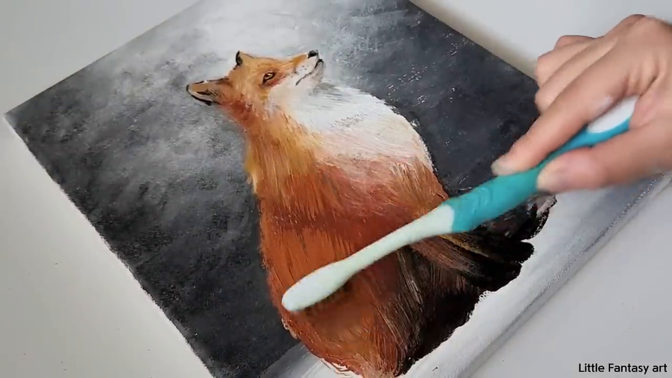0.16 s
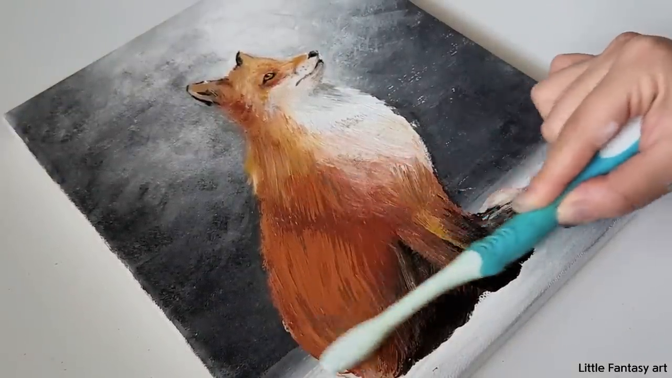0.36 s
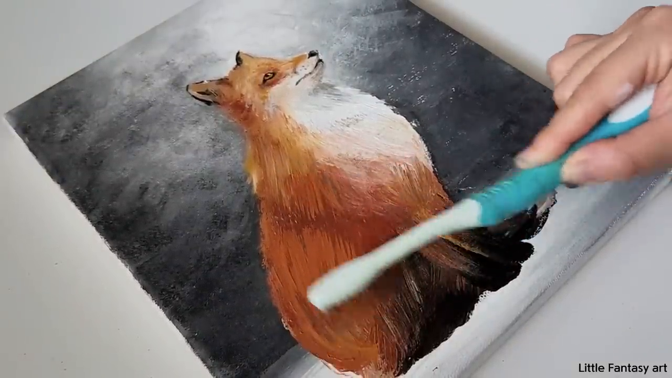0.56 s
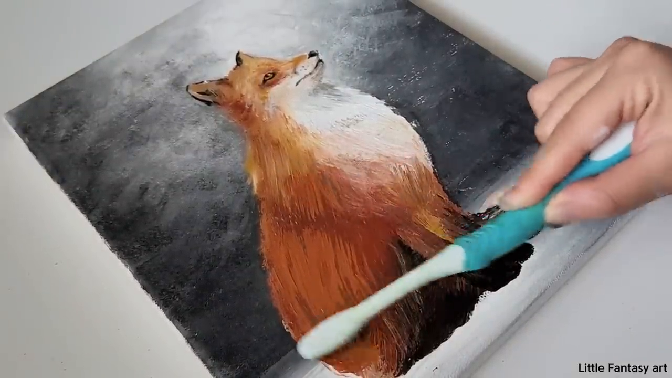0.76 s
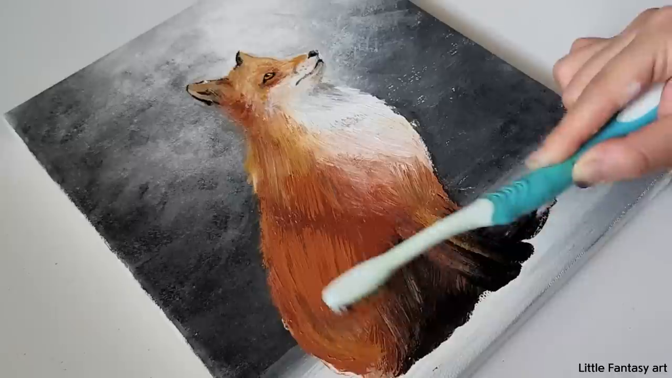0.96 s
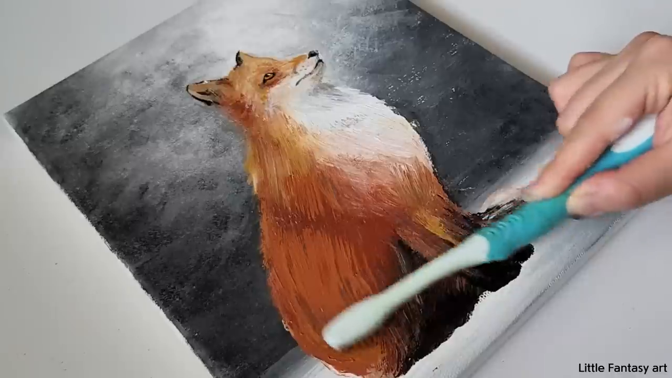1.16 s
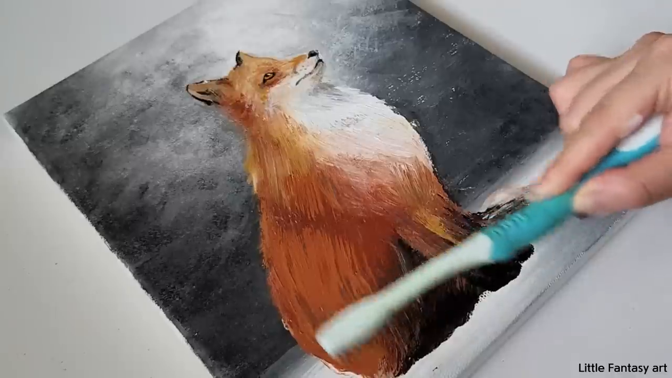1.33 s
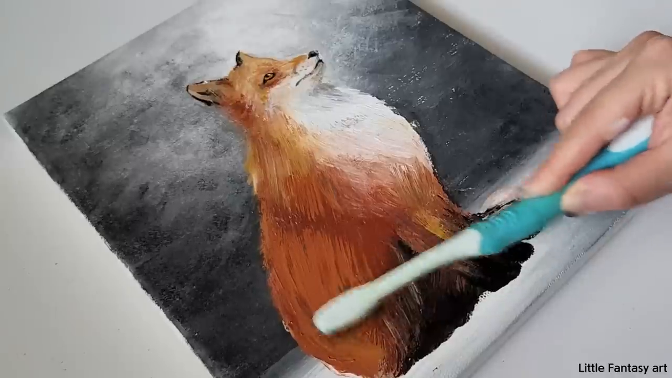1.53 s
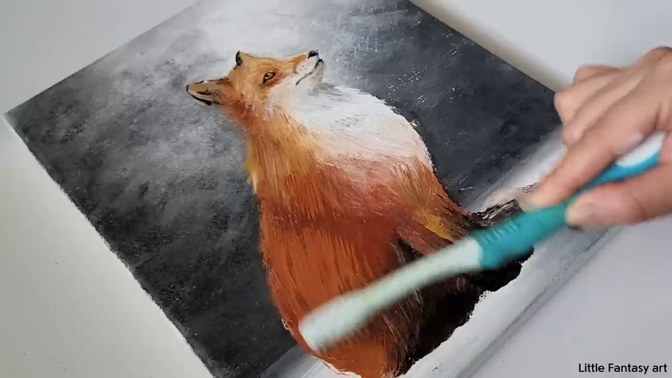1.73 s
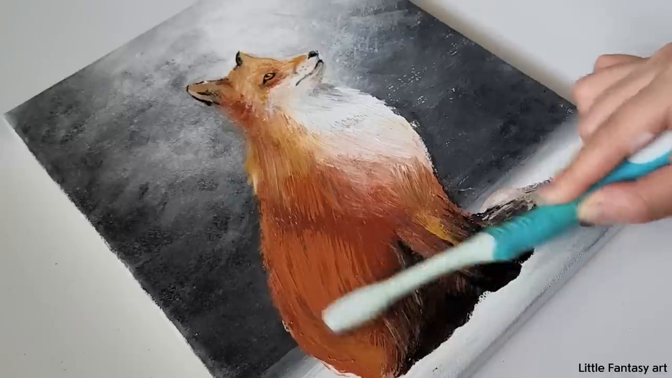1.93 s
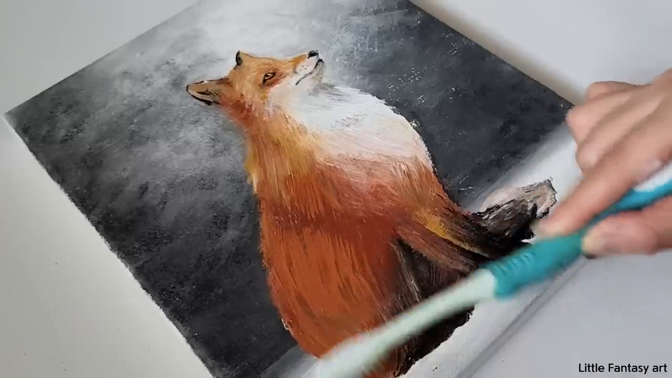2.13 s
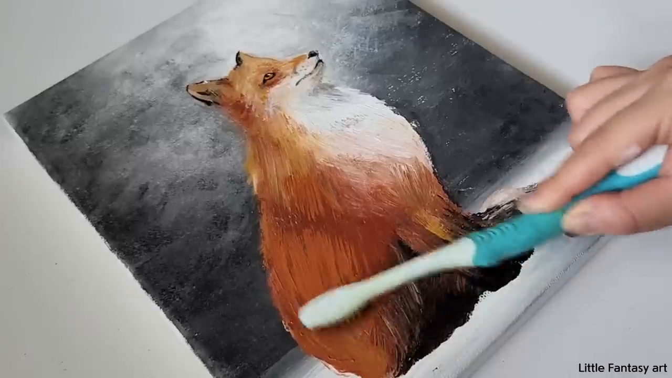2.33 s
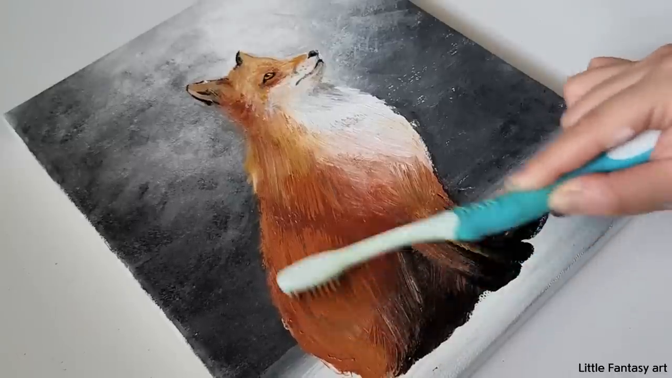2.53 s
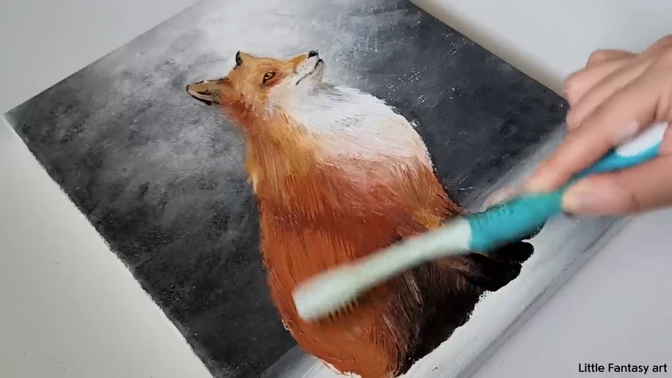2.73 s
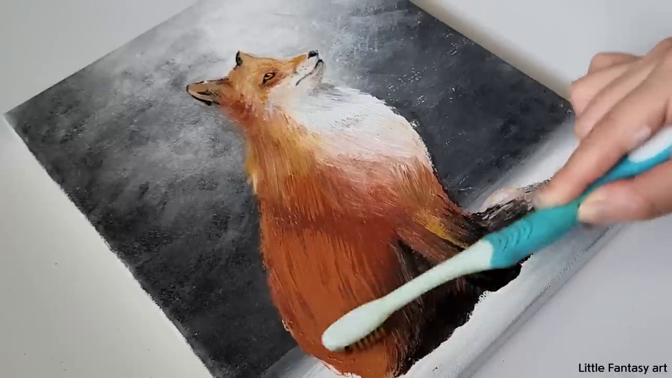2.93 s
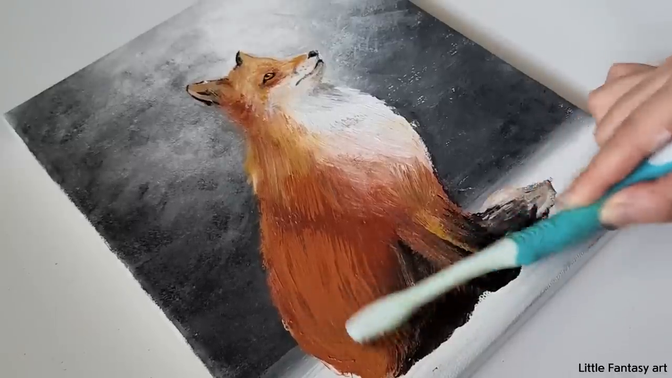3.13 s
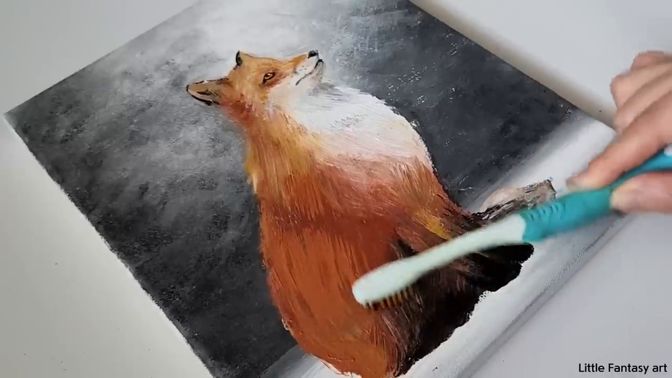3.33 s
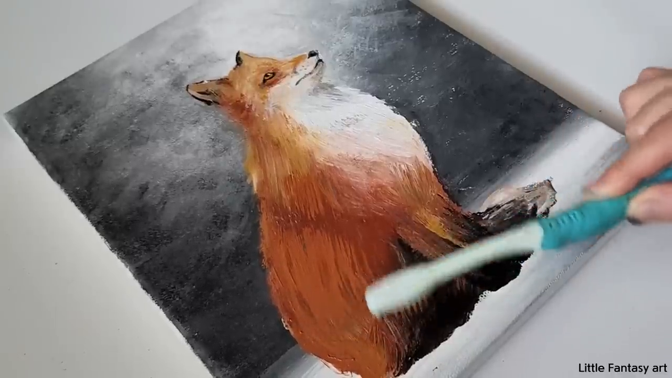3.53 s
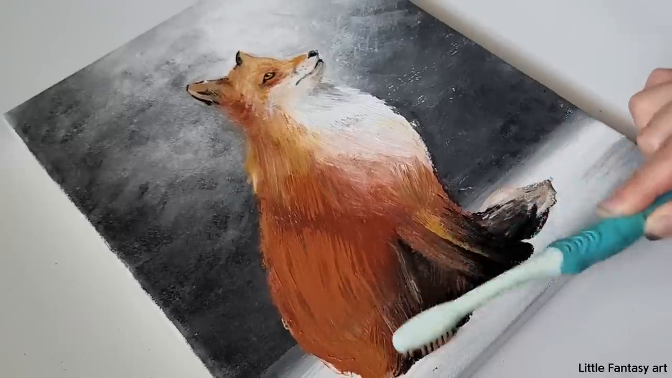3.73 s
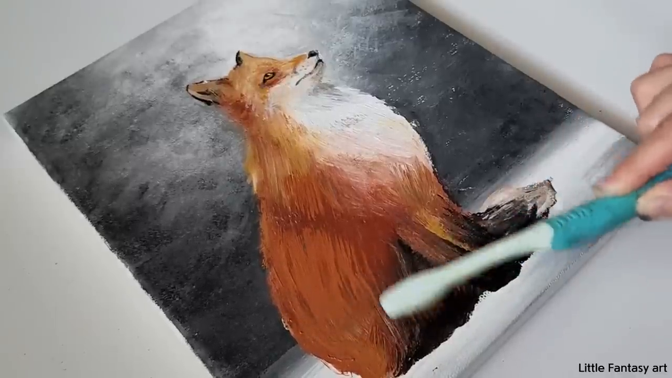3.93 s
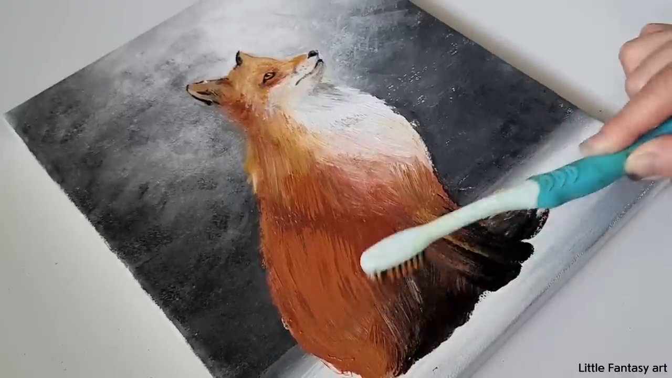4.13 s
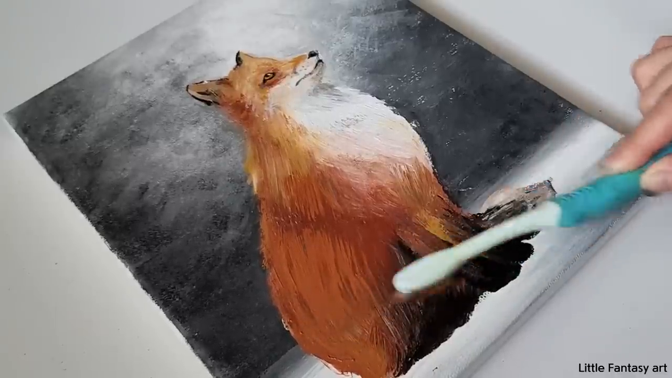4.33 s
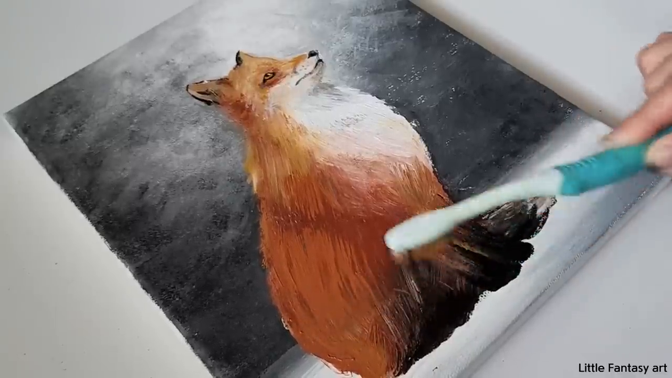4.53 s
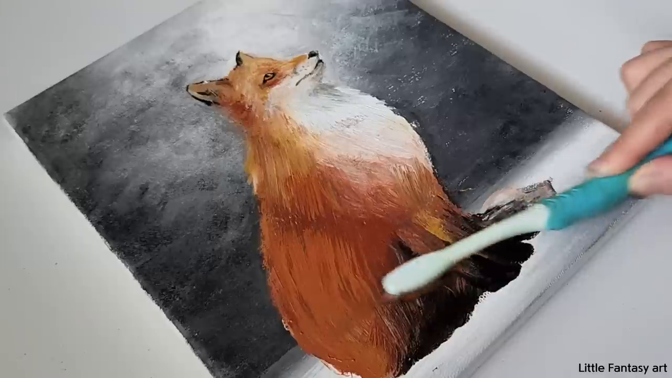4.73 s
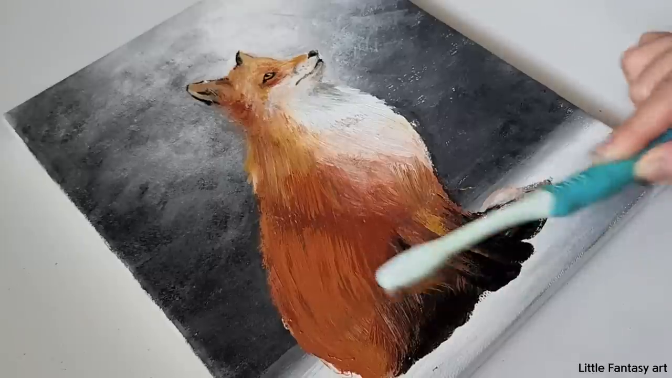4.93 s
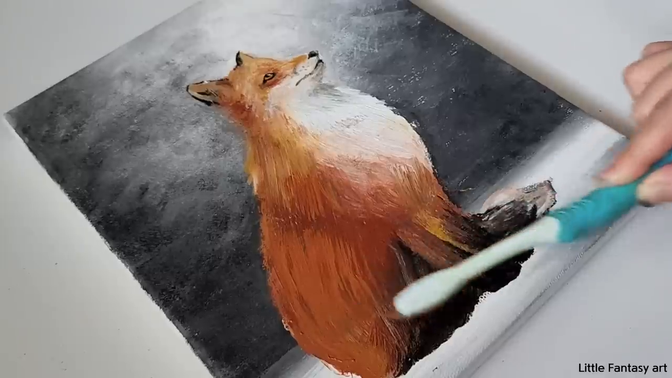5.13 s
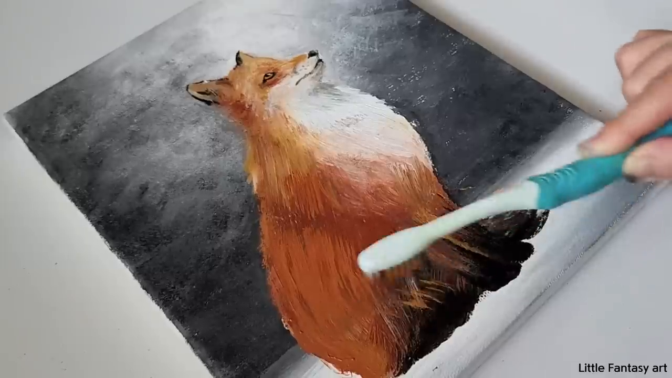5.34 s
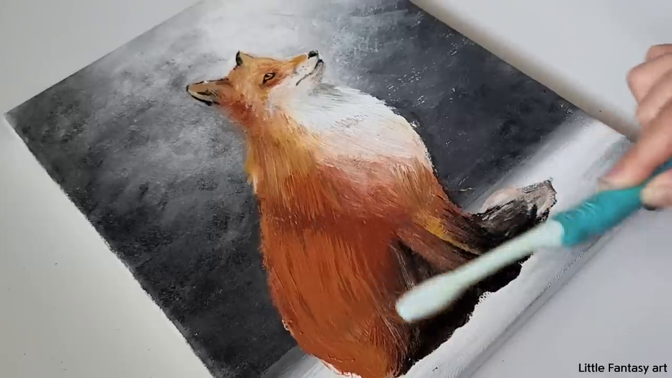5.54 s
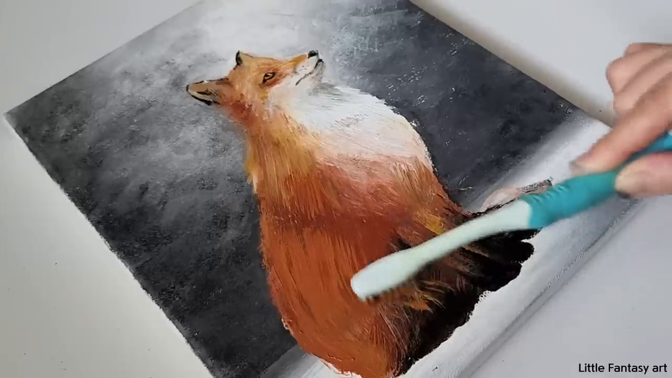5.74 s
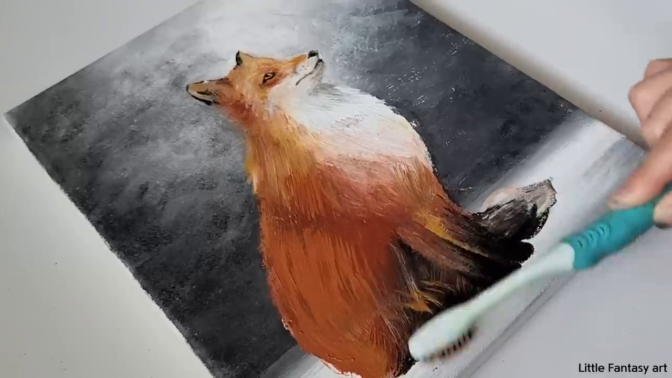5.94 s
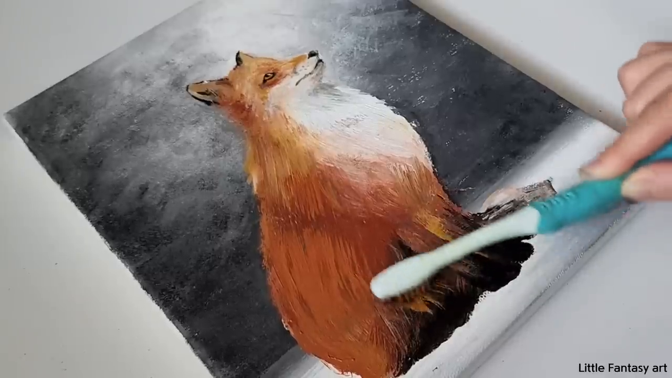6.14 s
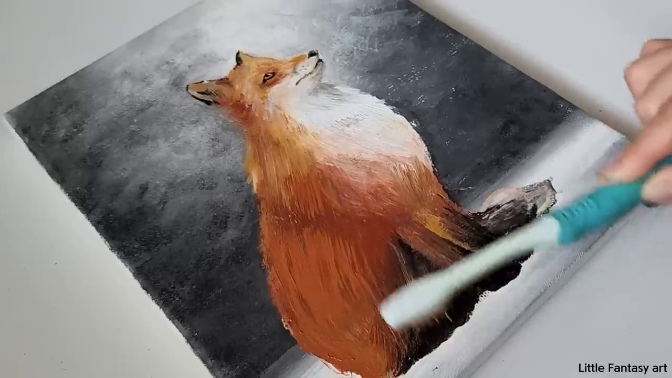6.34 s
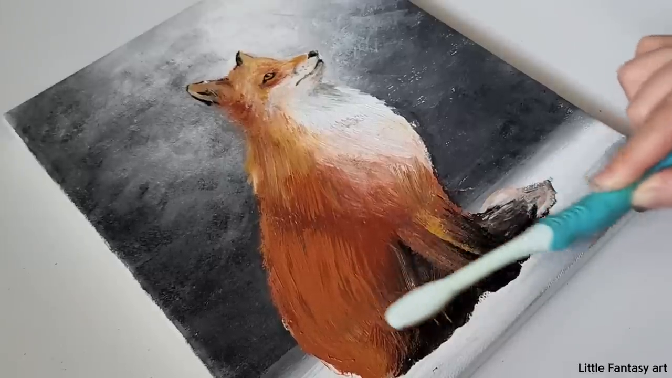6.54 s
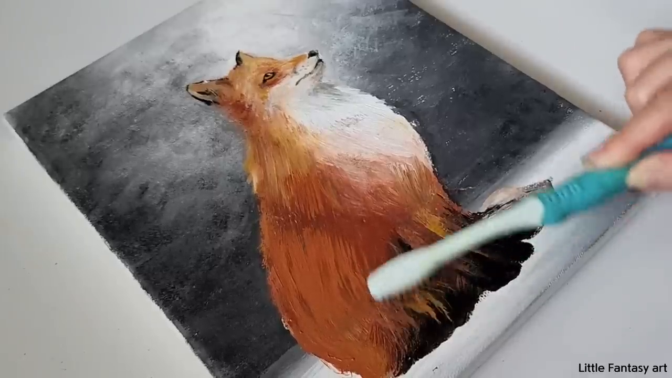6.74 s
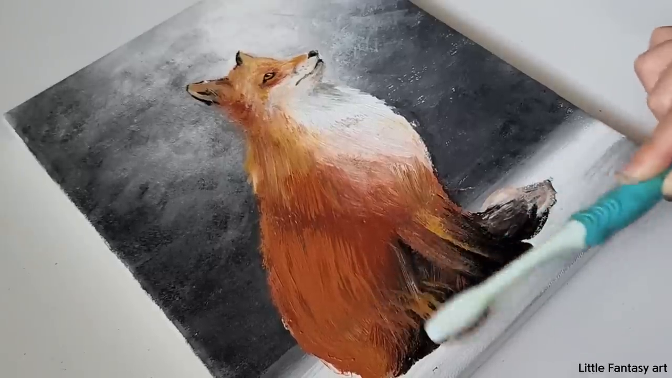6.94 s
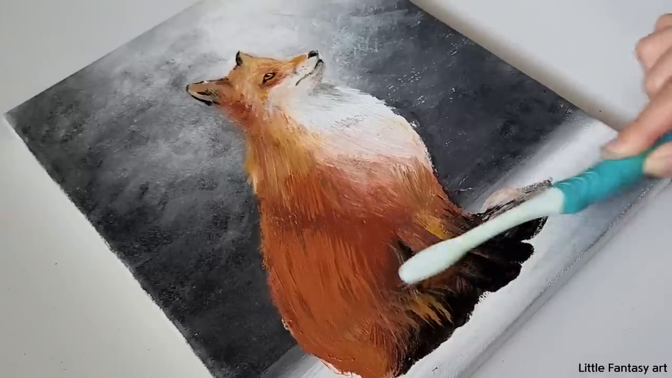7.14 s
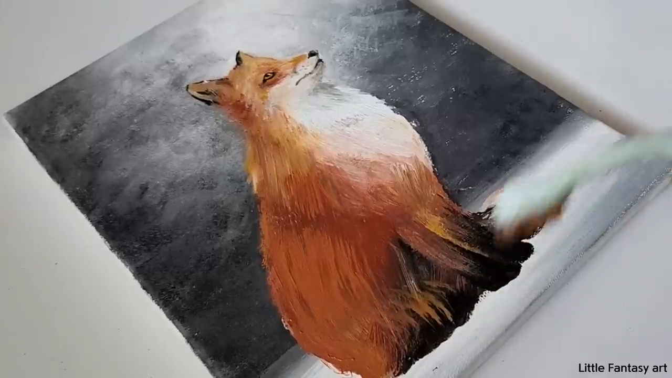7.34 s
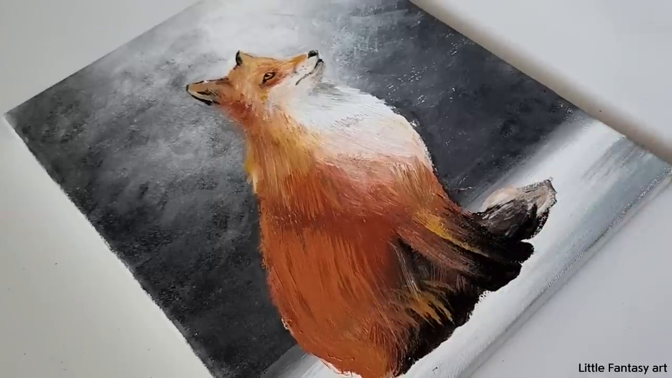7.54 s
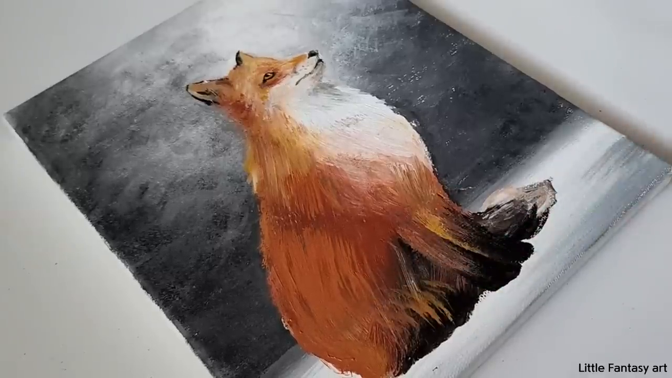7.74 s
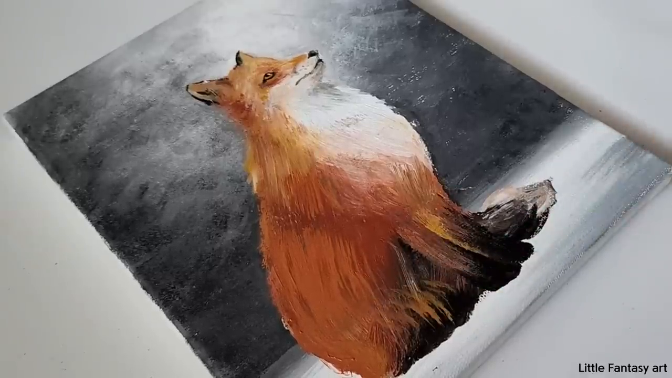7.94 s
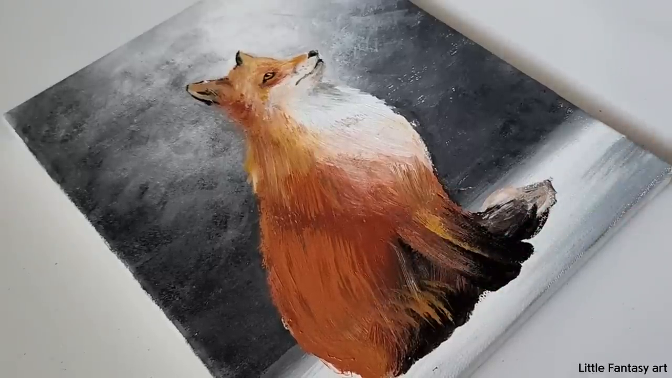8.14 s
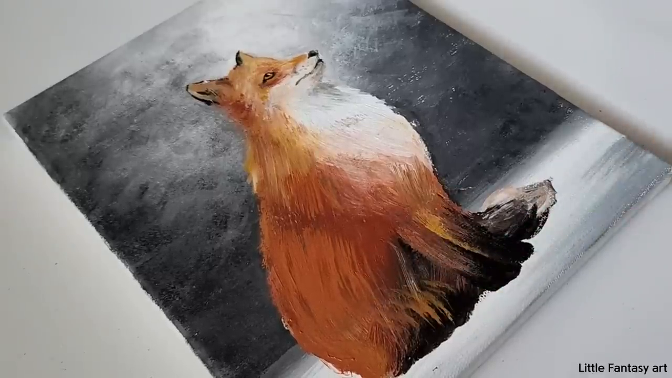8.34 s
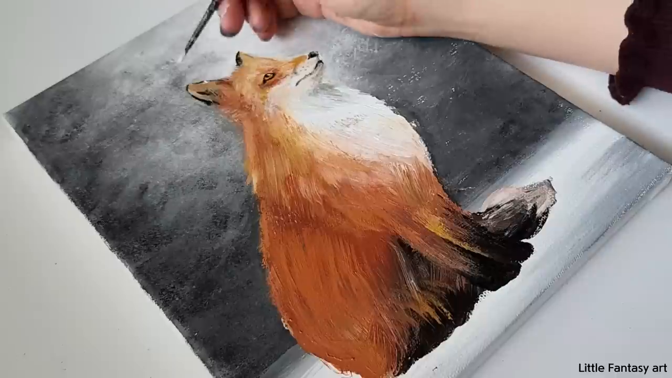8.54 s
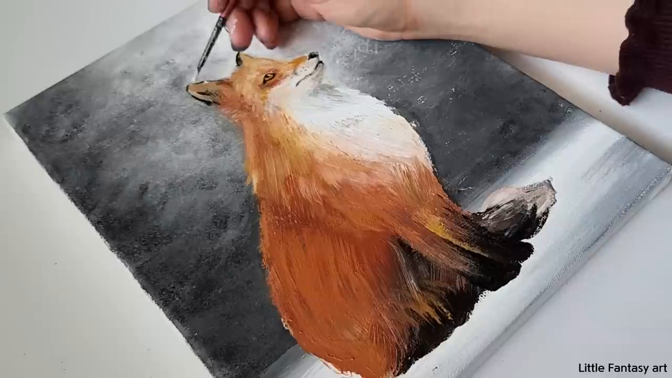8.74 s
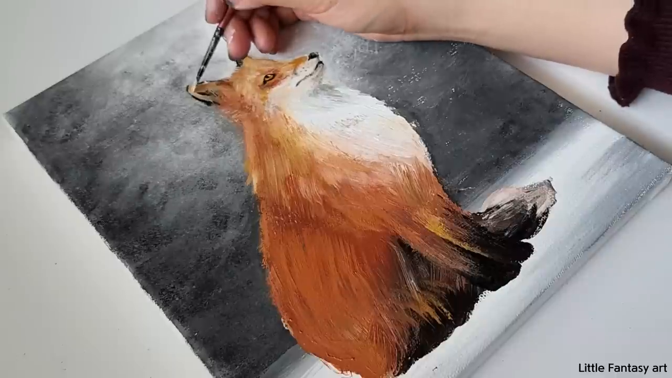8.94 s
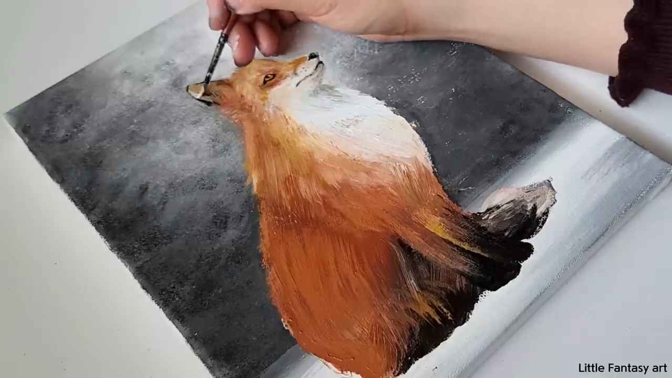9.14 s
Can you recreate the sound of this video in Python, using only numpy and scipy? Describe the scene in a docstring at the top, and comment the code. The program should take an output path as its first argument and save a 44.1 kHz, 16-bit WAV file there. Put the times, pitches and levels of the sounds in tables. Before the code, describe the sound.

A toothbrush strokes paint on a stretched canvas, very close to a stereo microphone in a small, dry room. Each stroke lands with a small plastic click and hollow knock, then a brief crisp rasp of bristles with the cloth drumming faintly beneath. Strokes start somewhat longer and slower, then become short and brisk. After about seven seconds they stop, leaving faint hiss, low rumble, tiny rustles and one soft bump.

```python
"""Brush strokes on canvas

A toothbrush strokes paint on a stretched canvas close to a two-port microphone. Each landing taps: filtered noise
makes the click, struck resonances the knock and thud. Then the bristles rasp over the weave: random impulses
make the hiss and set the canvas modes drumming. A small room answers. After the last stroke only the quiet
room is left: shaped noise for low rumble, hiss and a few faint rustles, and one soft low bump.
"""
import sys
import numpy as np
from scipy import signal
from scipy.fft import rfft, irfft, next_fast_len
from scipy.io import wavfile
from scipy.ndimage import uniform_filter1d, map_coordinates

SR = 44100
rng = np.random.default_rng(int(sys.argv[2]) if len(sys.argv) > 2 else 0)


def to_wav(s):
    """Save 16-bit WAV."""
    ch = np.atleast_2d(s).T  # columns
    pcm = np.round(np.clip(ch, -1, 1) * 32767)  # PCM
    wavfile.write(sys.argv[1], SR, pcm.astype(np.int16))


N = 409239
TIME = np.arange(N) / SR

# Brush strokes, one a row: start_s, click_level_db, knock_over_click_db, thud_over_click_db,
# knock_upper_modes_db, wait_before_sweep_s, sweep_length_s, rasp_level_db, swell_along_sweep_db, landing_scuff_db
STROKES = [(-0.2, -40.5, -8.5, -8, 0, 0.054, 0.15, -40.5, -6, -61),
           (0.1835, -28, -4, -13.5, -27, 0.057, 0.23, -47.5, 8, -62.5),
           (0.643, -29.5, -13.5, -18, -9, 0.034, 0.2, -46, 10.5, -82),
           (1.061, -39, 10.5, -4.5, 4, 0.092, 0.12, -43.5, -7.5, -66.5),
           (1.4129, -26, -0.5, -12, 5, 0.099, 0.15, -42.5, -6, -60.5),
           (1.816, -30.5, 1.5, -9.5, -27, 0.07, 0.2, -43.5, -4, -69),
           (2.253, -27, -6, -18.5, -4, 0.076, 0.1, -44.5, -5.5, -64),
           (2.554, -27.5, -3.5, -15.5, 0.5, 0.051, 0.11, -45.5, -11, -81),
           (2.802, -31, 3.5, -7, 6, 0.036, 0.12, -45, -11.5, -88),
           (3.064, -28.5, 6, -5, -14, 0.018, 0.11, -44.5, -3.5, -89),
           (3.3146, -23, 2, -17.5, 7.5, 0.012, 0.12, -48, 6, -88),
           (3.6, -44, 9.5, -4, 4, 0.034, 0.096, -49, -0.5, -62.5),
           (3.87, -31.5, 3.5, -7, 9, 0.039, 0.068, -46.5, 5.5, -63),
           (4.2354, -28, -1.5, -11, 2, 0.074, 0.097, -41, 5.5, -61.5),
           (4.6433, -22.5, 2, -16, 7.5, 0.087, 0.093, -39.5, -1, -61.5),
           (5.009, -24, -4.5, -11, -14, 0.089, 0.099, -40.5, -1.5, -62.5),
           (5.425, -26, 4, -7.5, -1, 0.059, 0.12, -42.5, -5, -62),
           (5.7837, -27.5, -1.5, -10, -9, 0.06, 0.1, -43, 1, -57.5),
           (6.1046, -32, 10, -2.5, 7, 0.068, 0.1, -44, -1, -55),
           (6.4305, -25.5, -6, -10, -18, 0.073, 0.11, -44.5, -1.5, -59),
           (6.771, -34, 14, 0, 12.5, 0.074, 0.095, -44.5, -5, -56),
           (7.07, -23, -4, -14.5, 0, 0.074, 0.074, -41, 4, -61)]
# Tips touching again: start_s, start_level_db (before the lowpass)
BOUNCES = [(1.097, -46.5), (2.300, -38.5), (5.462, -35)]
# Resonances of the stretched cloth: pitch_hz, width_hz, relative_level_db
CANVAS_MODES = [(274.3, 73, -13.5), (349, 80, -9.5), (624, 149, -4.5), (705.4, 36, 2), (810.3, 29.7, -7.5),
                (1083, 59, -5.5), (1163, 230, -11.5), (1440, 19, -11.5)]
# Resonances of the stretcher on the table: pitch_hz, width_hz, relative_level_db
FRAME_MODES = [(52, 4.8, 7.5), (124, 22.2, 4), (165, 23, 2), (250.5, 31, 4)]
# Colour of the bristle hiss: frequency_hz, relative_level_db (per Hz)
BRISTLE_COLOUR = [(760, -65), (1300, -1), (1700, 1.5), (2800, 0), (4000, 0), (5600, -2), (6800, -11),
                  (7500, -5.5), (8500, -10.5), (12000, -13), (15700, -16)]
# Colour of the landing click: frequency_hz, relative_level_db
CLICK_COLOUR = [(800, -46), (1600, 8), (3000, 10), (6000, -0.5), (9000, -16)]
# Balance of the canvas as strokes drift toward the taut edge: time_s, deep_over_tight_modes_db
PLACE = [(0, 0.5), (1.2, -1), (2.5, -1.5), (4, -3), (7.3, -4.5)]
# Drumming under the hand's pressure on the brush: time_s, gain_db
PRESSURE = [(0, 2.5), (1.5, -2.5), (2.8, -4), (3.2, -2.5), (5, -2), (5.9, -3.5)]
# Crisp peak of the rasp: time_s, gain_db
SHEEN = [(0, 3.5), (1.6, -1), (3.2, -0.5), (4.5, -0.5), (7.3, -3)]
# Band just above the crisp peak: time_s, gain_db
ABOVE_SHEEN = [(1.2, 3), (2.8, 8), (4.3, -1), (6.8, 7)]
# Stereo likeness of the brush: frequency_hz, left_right_likeness (0 to 1)
BRUSH_LIKENESS = [(100, .99), (700, 0.94), (1500, 0.7), (5000, 0.66), (10000, 0.35)]
# Colour of the right port: frequency_hz, gain_db
RIGHT_PORT_COLOUR = [(250, -0.5), (800, 1), (1300, -5), (2000, 3.5), (2900, -1), (3800, 3), (5000, 11.5),
                     (5750, 7), (6300, 0), (7400, 6), (8200, -3.5), (9200, -18), (10300, 0.5)]
# Head start of the left port: time_s, lead_s
LEFT_LEAD = [(0, 0.00013), (7.4, 0.000095)]
# Decay of the room: frequency_hz, t60_s
ROOM_DECAY = [(200, 0.14), (1000, 0.21), (5000, 0.041), (12000, 0.19)]
# Stereo likeness of the room noise: frequency_hz, left_right_likeness (0 to 1)
ROOM_LIKENESS = [(40, 1), (200, 0.64), (800, 0.02)]
# Level of the rumble: time_s, level_db
RUMBLE_LEVEL = [(0.15, -62.5), (1.01, -62.5), (1.14, -55), (1.5, -58.5), (3.95, -64), (7.03, -59.5),
                (7.39, -62), (7.96, -62), (8.94, -66), (9.28, -65.5)]
# Colour of the rumble: frequency_hz, relative_level_db (per Hz)
RUMBLE_COLOUR = [(20, -13.5), (38, -3), (51, 5), (64, 3), (80, -10.5), (150, -10.5), (260, -88)]
# Level of the hiss: time_s, level_db
HISS_LEVEL = [(0, -67.5), (7.4, -66.5), (8.3, -69), (8.6, -72), (9.28, -72.5)]
# Colour of the hiss: frequency_hz, relative_level_db (per Hz)
HISS_COLOUR = [(90, -34), (150, -2.5), (400, -7), (900, -13.5), (1750, -15.5), (2150, -10), (2600, -19),
               (3400, -20), (4600, -19.5), (5300, -12.5), (6300, -20.5), (7500, -16.5), (8700, -42.5),
               (12500, -29.5), (15000, -60)]
# Faint rustles in the pause: peak_s, level_db, fade_s, colour_hz
RUSTLES = [(7.58, -67, 0.1, 5160), (7.47, -65, 0.016, 450), (7.68, -64, 0.025, 600),
           (7.855, -66, 0.036, 7050), (8.12, -68, 0.029, 2500), (8.29, -69, 0.015, 700),
           (8.385, -66.5, 0.035, 5500), (8.455, -63.5, 0.045, 3600)]

RISE_S, FALL_S = 0.011, 0.012  # the sweep gathers and loses speed
SETTLE_DB_PER_S = 66  # the scuff of the landing dies away
CLIMB_DB = 3  # a sweep moves the deep modes from this far up to this far down
LIFT_DB = 4  # the drumming drops as the brush leaves the cloth
EDGE_DB_PER_S = 0.08  # the top treble grows as the strokes go on
RUSTLE_RISE_S = 0.0039
BUMP_S, BUMP_DB, BUMP_FADE_S = 7.99, -51.5, 0.022  # a soft low bump on the table
TOP_HZ = 15800  # band limit


def rasp():
    """The same bristle slips sound directly as fizz and shake the canvas, harder under more pressure."""
    level_db, done = sweep()
    force = paired(slips(11000), slips(11000), BRUSH_LIKENESS)
    patched = patchy(force, depth_db=2.0)
    fizz = unit(filtered(patched, lambda hz: amp(along(BRISTLE_COLOUR, hz))))
    edge = filtered(fizz, lambda hz: 1 - 1 / (1 + (hz / 9000) ** 6))

    # three bands of canvas modes: deep ones recede and tight ones come forward along the sweep
    drum = unit(filtered(patched, modes(CANVAS_MODES)))
    deep = filtered(drum, lambda hz: 1 / (1 + (hz / 650) ** 12))
    high = filtered(drum, lambda hz: 1 / (1 + (950 / (hz + 1)) ** 6))
    middle = drum - deep - high
    place_db = curve(PLACE) - CLIMB_DB * (2 * done - 1)
    drum = amp(place_db) * deep + amp(-0.6 * place_db) * middle + amp(-1.3 * place_db - 3.5) * high

    level_db = level_db + 1.2 * wobble(60)
    sheen = filtered(fizz, lambda hz: np.exp(-((hz - 5450) / 1000) ** 2))
    # a louder sweep is brighter
    edge_db = 0.074 * (level_db + 53) + TIME * EDGE_DB_PER_S
    fizz = fizz - edge + amp(edge_db) * edge
    # a very faint scuff is dull
    sheen_db = 0.086 * np.clip(level_db + 83, -30, 0) + curve(SHEEN)
    fizz = fizz - sheen + amp(sheen_db) * sheen
    above = filtered(fizz, lambda hz: np.exp(-((hz - 6500) / 550) ** 2))
    fizz = fizz + (amp(curve(ABOVE_SHEEN)) - 1) * above

    # slow creep already drums, before the tips hiss
    drum_db = -42.0 + 0.87 * (level_db + 45.5) + curve(PRESSURE)
    drum_db -= LIFT_DB * uniform_filter1d(1. * (done >= 1), size=700)
    drum_db += 1.5 * wobble(45)
    return amp(level_db) * fizz + amp(drum_db) * drum


def sweep():
    """Rasp level in dB and share of the sweep done: the hand gathers speed, then loses it."""
    rows = np.array(STROKES)
    row = rows[np.searchsorted(rows[:, 0], TIME) - 1].T  # the stroke under way at each moment
    since = TIME - row[0]
    wait, length, db, swell_db, scuff_db = row[5:]
    done = np.clip((since - wait) / length, 0, 1)
    gather = 1 / (1 + np.exp((wait - since) / RISE_S))
    speed = gather / (1 + np.exp((since - wait - length) / FALL_S))
    scuff = amp(scuff_db - SETTLE_DB_PER_S * since)
    level = amp(db + swell_db * (done - .5)) * speed + scuff
    return 20 * np.log10(level + 1e-9), done


def slips(rate):
    """Bristle tips catch and jump over threads: scattered impulses of uneven size, rate a second."""
    jumps = rng.random(N) < rate / SR
    return unit(jumps * rng.standard_normal(N))


def patchy(x, depth_db):
    """Random colour that shifts smoothly over time and frequency."""
    z = signal.stft(x, nperseg=512)[2]
    field = uniform_filter1d(rng.standard_normal(z.shape[1:]), size=4, axis=0)  # smooth over frequency
    field = uniform_filter1d(field, size=8, axis=1)  # smooth over time
    return signal.istft(z * amp(depth_db * unit(field)), nperseg=512)[1][:, :N]


def taps():
    """Each landing is a click of plastic and tips, a knock of the canvas and a thud of its frame."""
    out = np.zeros(N + SR)
    t = np.arange(SR // 4) / SR
    push = -(t / 0.0013) * np.exp(1 - t / 0.00018)  # a short blow
    slow = (t / .0012) * np.exp(1 - t / 0.00076)  # the frame follows a softer push
    sharp = -t * np.exp(-t / .00011)  # the blow on the canvas
    peak = lambda x: x / np.max(np.abs(x))
    free = np.array(CANVAS_MODES[1:]) * [1, .8, 1]  # narrower modes: the bristles do not yet damp the cloth
    for s, db, knock_db, thud_db, upper_db, *_ in STROKES[1:]:  # the first stroke is already under way
        tips = filtered(rng.standard_normal(len(t)), lambda hz: amp(along(CLICK_COLOUR, hz)))
        click = 0.071 * push + 0.48 * amp(-60 * t / 0.0088) * unit(tips)
        struck = modes(free, scatter_db=2, sign=1)
        tilt = lambda hz: amp(upper_db / (1 + (950 / (hz + 1)) ** 8))
        knock = amp(knock_db) * peak(filtered(sharp, lambda hz: struck(hz) * tilt(hz)))
        frame = modes(FRAME_MODES, scatter_db=3)
        thud = amp(thud_db) * peak(filtered(slow, frame))
        first = round((s + .0014) * SR)  # the tap sounds 1.4 ms after its listed start
        out[first:][:len(t)] += amp(db) * (click + knock + thud)
    for s, db in BOUNCES:
        out[round(s * SR):][:len(t)] += amp(db - 60 * t / .016) * rng.standard_normal(len(t))
    lowpass = signal.butter(4, 7500, fs=SR, output='sos')  # the taps are dull above 7.5 kHz
    dull = signal.sosfilt(lowpass, out[:N])
    return np.array([dull, dull])


def ports(pair):
    """The brush is nearer the left port; the right one hears it later, round the microphone body."""
    late = map_coordinates(pair[1], [(TIME - curve(LEFT_LEAD)) * SR], order=3)
    # phase lag in radians: the canvas tones lag more than the hiss
    detour = lambda hz: 0.27 * np.exp(-(np.log((hz + 1) / 700) / 0.27) ** 2)
    shade = lambda hz: causal(along(RIGHT_PORT_COLOUR, hz)) * np.exp(-1j * detour(hz))
    return np.array([pair[0], filtered(late, shade)])


def echoes(x):
    """The small room answers with a noise tail; each frequency dies at its own speed."""
    hz, t, z = signal.stft(rng.standard_normal((2, SR // 2)), SR, nperseg=256)
    decay = amp(-60 * t / along(ROOM_DECAY, hz)[:, None])
    tail = signal.istft(z * decay, SR, nperseg=256)[1]
    delayed = np.pad(x, ((0, 0), (250, 0)))  # samples before the room answers
    return signal.fftconvolve(delayed, tail / np.linalg.norm(tail[0]), axes=1)[:, :N]


def background():
    """Shaped noise for swelling rumble, slowly fading hiss and short rustles, plus the soft bump."""
    return rumble() + hiss() + rustles() + bump()


def rumble():
    """Low noise that swells and sinks."""
    return amp(curve(RUMBLE_LEVEL)) * noise(RUMBLE_COLOUR)


def hiss():
    """Coloured noise that thins in its middle near the end."""
    air = noise(HISS_COLOUR)
    middle = filtered(air, lambda hz: np.exp(-(np.log((hz + 1) / 3500) / 0.22) ** 4))
    air = air - np.interp(TIME, [8.45, 8.55], [0, .4]) * middle
    return amp(curve(HISS_LEVEL)) * air


def rustles():
    """Short noise puffs, each with its own colour, that rise fast, fade softly and flutter."""
    total = 0
    for s, db, fade, hz in RUSTLES:
        swell = np.exp(-((TIME - s) / np.where(TIME < s, RUSTLE_RISE_S, fade)) ** 2)
        total = total + amp(db) * swell * noise([(hz / 8, -6), (hz, 0), (hz * 5, -24), (hz * 30, -90)])
    return amp(1.8 * wobble(150)) * total


def bump():
    """A soft bump on the table: a short pulse of sine at the pitch of the lowest frame mode."""
    after = np.maximum(TIME - BUMP_S, 0)
    swell = after / BUMP_FADE_S * np.exp(1 - after / BUMP_FADE_S)
    return amp(BUMP_DB) * swell * np.sin(2 * np.pi * FRAME_MODES[0][0] * after)


def noise(spectrum):
    """Room noise of rms 1 in a given colour."""
    pair = paired(*rng.standard_normal((2, N)), ROOM_LIKENESS)
    return unit(filtered(pair, lambda hz: amp(along(spectrum, hz))))


def amp(db):
    """Decibels to linear gain."""
    return 10 ** (np.asarray(db) / 20)


def unit(x):
    """Scale to rms 1."""
    return x / np.sqrt(np.mean(x ** 2) + 1e-20)


def along(points, hz):
    """Interpolate (frequency_hz, value) points on a log frequency axis."""
    f, v = np.transpose(points)
    return np.interp(np.log(hz + 1), np.log(f + 1), v)


def curve(rows):
    """Interpolate (time_s, value) rows to one value per sample."""
    return np.interp(TIME, *np.transpose(rows))


def wobble(rate):
    """A smooth random curve, rate knots a second."""
    return map_coordinates(rng.standard_normal(int(N * rate / SR) + 4), [TIME * rate])


def filtered(x, response):
    """x shaped by a complex response of frequency."""
    m = next_fast_len(x.shape[-1] + 8192)
    return irfft(rfft(x, m) * response(np.fft.rfftfreq(m, 1 / SR)), m)[..., :x.shape[-1]]


def modes(table, scatter_db=0, sign=-1):
    """Causal response of a set of resonances; sign -1 = neighbours in opposite phase."""
    gain = amp(scatter_db * rng.standard_normal(len(table)))
    return lambda f: sum(sign ** k * gain[k] * amp(db) * 1j * f * w / (c * c - f * f + 1j * f * w)
                         for k, (c, w, db) in enumerate(table))


def causal(db):
    """Minimum-phase response: the phase that a real cavity gives to a colour."""
    log_gain = np.log(amp(db))
    mirrored = np.r_[log_gain, log_gain[-2:0:-1]]
    return np.exp(np.conj(signal.hilbert(mirrored))[:len(db)])


def paired(a, b, alike):
    """Mix two unrelated signals into left and right of the given likeness."""
    turn = lambda hz: np.arccos(np.clip(along(alike, hz), -1, 1)) / 2
    mid, side = filtered(np.array([a, b]), lambda hz: np.array([np.cos(turn(hz)), np.sin(turn(hz))]))
    return np.array([mid + side, mid - side])


def scene():
    """Rasp and taps reach both ports, the room answers them, and the background lies beneath."""
    brush = ports(rasp()) + ports(taps())
    return brush + amp(-8.5) * echoes(brush) + background()


def record(dry):
    """Nothing is kept above the band limit."""
    return filtered(dry, lambda hz: hz < TOP_HZ)


dry = scene()
out = record(dry)
to_wav(out)
```